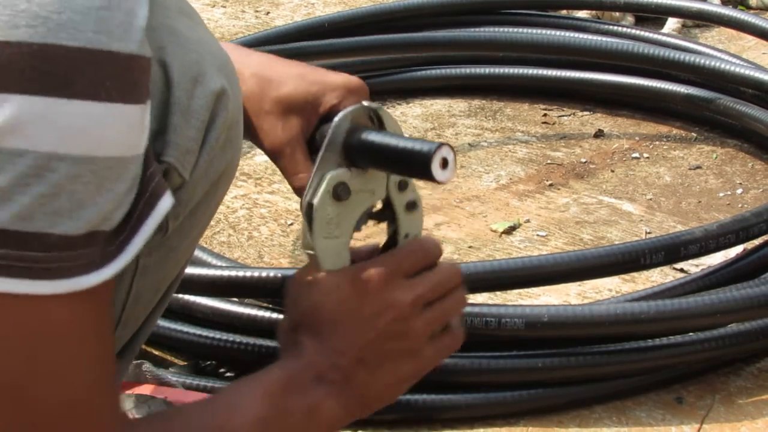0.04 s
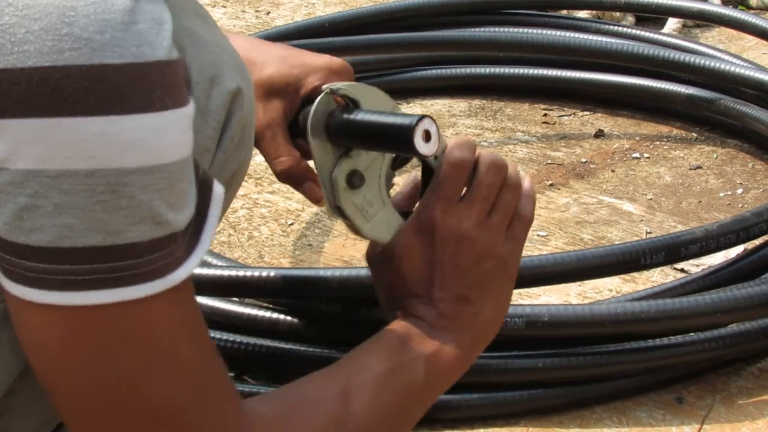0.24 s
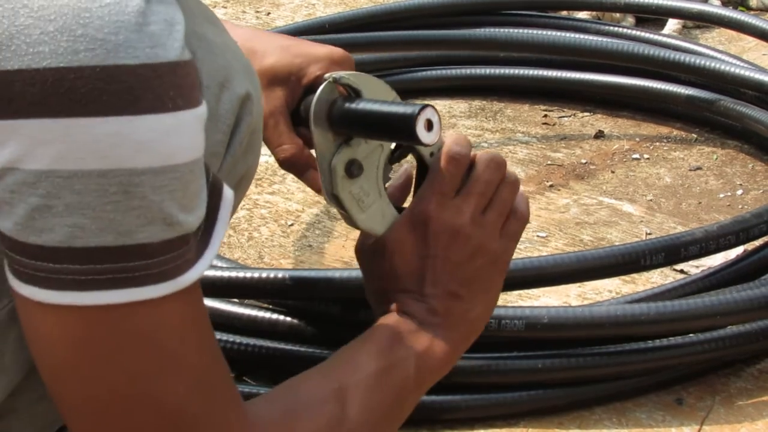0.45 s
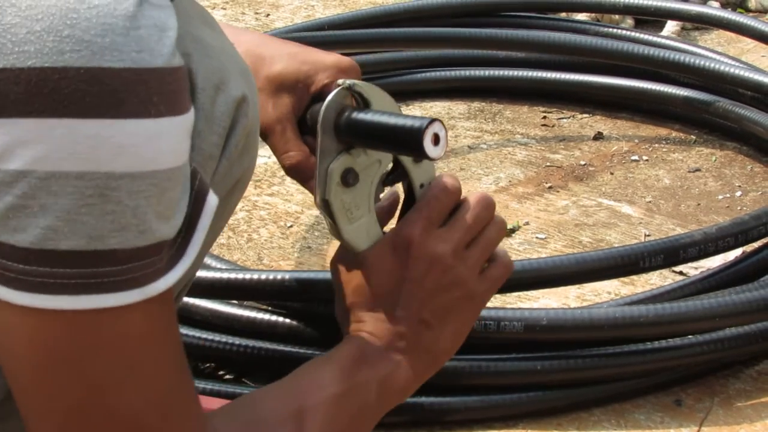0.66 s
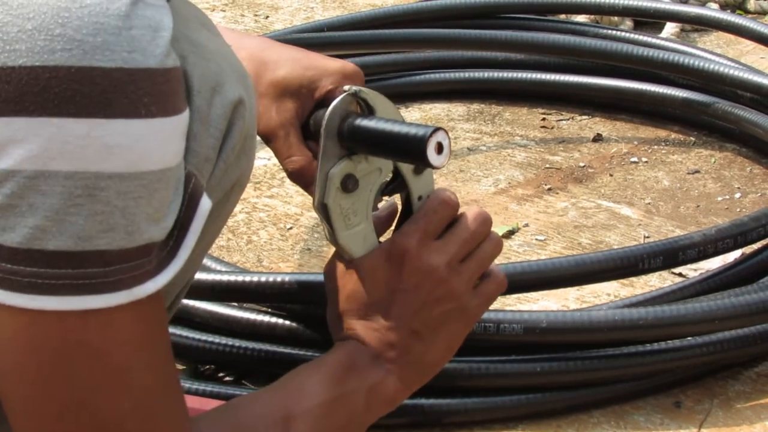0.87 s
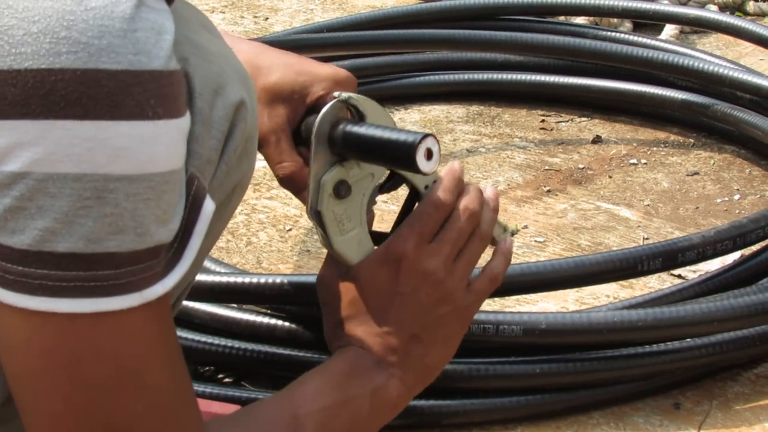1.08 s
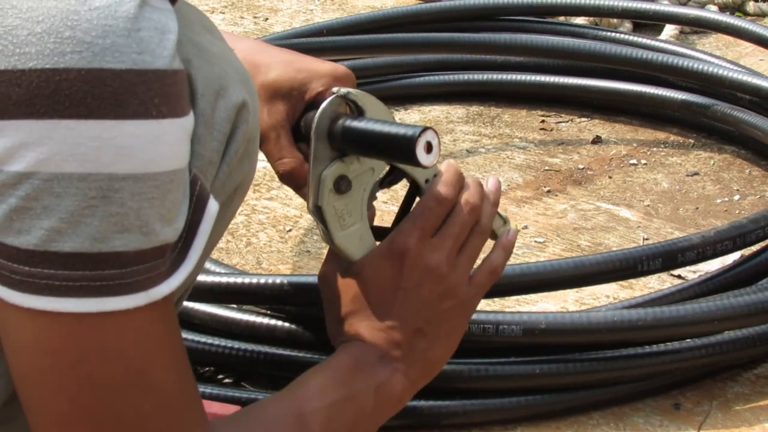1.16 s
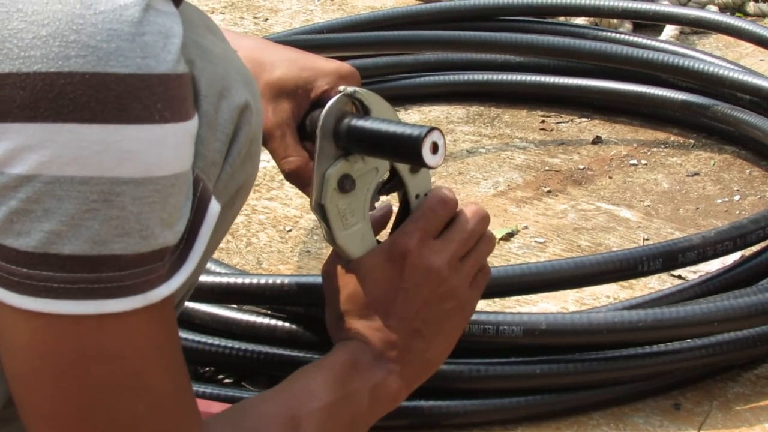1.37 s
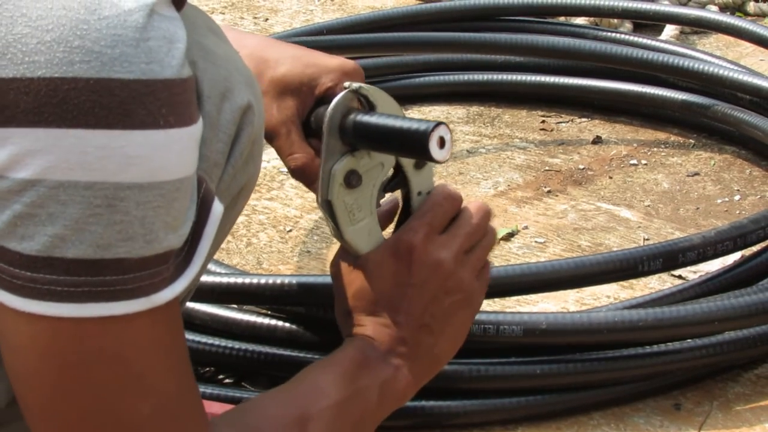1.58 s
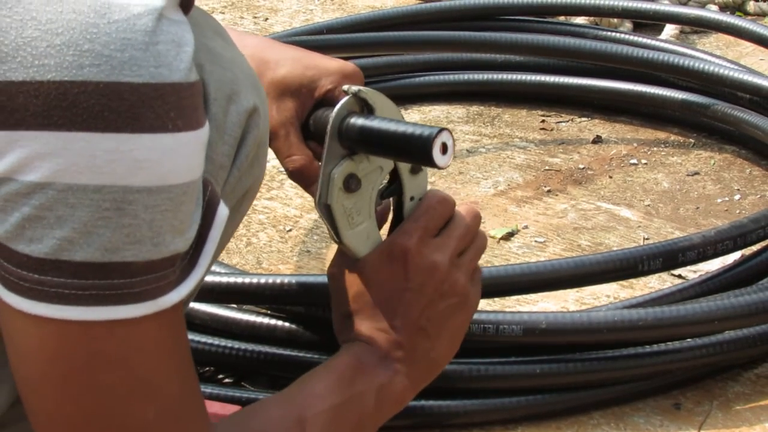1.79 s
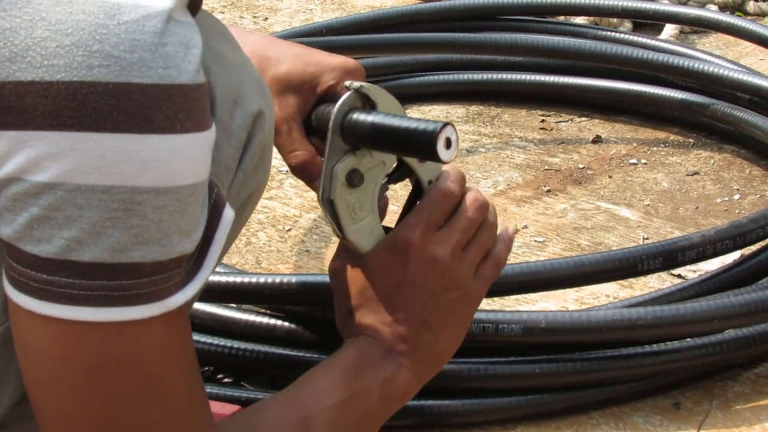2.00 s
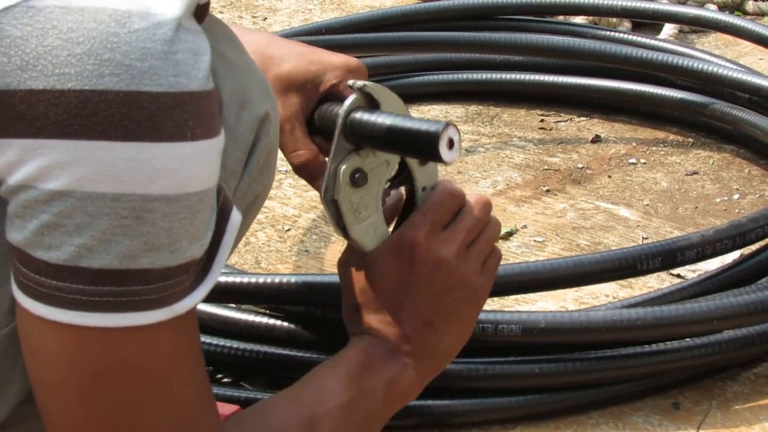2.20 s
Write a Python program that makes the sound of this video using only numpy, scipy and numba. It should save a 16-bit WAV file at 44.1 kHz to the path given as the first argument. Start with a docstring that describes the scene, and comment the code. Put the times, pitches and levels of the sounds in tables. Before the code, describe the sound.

Close by in a yard, a ratcheting cable cutter ticks sparsely, crunches into thick cable and clicks faster up to one hard steel snap. Behind it, a distant machine's fan and motor drone throughout.

```python
"""In a yard, a ratchet cutter is squeezed through a thick cable while a machine hums and blows some way off.
Each impact of the steel pawl excites the damped modes of the jaws and frame, and the cable fractures
with a short crunch. The machine's fan and motor sound harmonics of the shaft rate over a rush of air.
Automatic gain control ducks at the loud clicks and lets the background swell back;
one last hard snap overloads the microphone."""
import sys
import numpy as np
from scipy import signal
from scipy.fft import rfft, irfft
from scipy.io import wavfile
from scipy.ndimage import uniform_filter1d
from numba import njit

SR = 44100
rng = np.random.default_rng(int(sys.argv[2]) if len(sys.argv) > 2 else 0)


def store_wav(level_fs):
    """Save 16-bit WAV to argv[1]."""
    pcm = np.round(np.clip(np.atleast_2d(level_fs), -1, 1) * 32767)
    wavfile.write(sys.argv[1], SR, pcm.T.astype(np.int16))


N = 99225
TIME = np.arange(N) / SR
FREQS = np.maximum(np.arange(N // 2 + 1) * SR / N, 1)
SHAFT_HZ, BLADES = 69.23, 3
DIRECT_SIDE_DB, SCATTER_SIDE_DB = -11.5, -0.5  # side minus mid: direct sound is narrow, scatter wide


def pawl():
    """Impact excitation: the pawl drops onto a tooth, jaws and frame ring, and the yard reflects it."""
    # pawl impacts: start_s, gain_db, tilt_db_per_octave, low_ping_lift_db, frame_knock_db
    clicks = [(0.9814, -12, -5.5, 1, -20), (1.2647, -22.5, -4.5, 0, -20), (1.6801, -20, 4, 5, -15),
              (1.7848, -20, -5.5, 3.5, -20), (1.8161, -6.5, -1.5, 4.5, -18), (1.902, 19.5, 6.5, 0, -2.5),
              (2.2155, -29, -5, 0, -20), (2.2298, -22.5, -2, -3, -20)]
    # modes of the steel jaws: pitch_hz, gain_db, t60_s
    jaw_modes = [(3596, -18.5, 0.0216), (4090, -16, 0.026), (4270, -16.5, .045), (4440, -16.5, 0.029),
                 (5080, -19.5, 0.056), (6300, -14.5, 0.017), (7050, -17, 0.018), (8560, -5.5, 0.014),
                 (8850, -12, 0.019), (9300, -13, 0.023), (9890, -15.5, .026), (10810, -13.5, 0.018),
                 (12070, -16, 0.019), (13250, -24.5, .028), (14400, -21, .018)]
    # modes of the frame: pitch_hz, gain_db, t60_s
    frame_modes = [(1990, -14.5, 0.0067), (2400, -8, 0.0051), (2920, -11.5, 0.0055)]
    # spectrum of the steel contact: frequency_hz, relative_db
    contact_colour = [(300, -19), (1200, -22), (2600, -3), (4300, -7.5), (7600, -14), (9500, 11),
                      (12300, -10.5), (15500, -7.5)]
    # spectrum of its scatter off ground and cable coil: frequency_hz, relative_db
    scatter_colour = [(300, -14), (2800, -5), (4200, 0), (6200, 2.5), (7700, -8.5), (10500, -4.5),
                      (13500, -8), (15500, -9)]
    tail = from_db(-14) * decay(0.075) + from_db(-37) * decay(0.33)  # near scatter, then the yard
    # the scatter carries the jaws' resonances, each 40 Hz in half-width
    peaks = sum(from_db(db) / (1 + ((FREQS - hz) / 40) ** 2) for hz, db, _ in jaw_modes)
    scatter_db = at_hz(scatter_colour) + 14 * np.log10(peaks / peaks.max() + 0.1)
    out = np.zeros((2, N))
    for start_s, db, slope, ping_db, knock_db in clicks:
        brightness_db = tilt_db(FREQS, slope)
        contact = noise(at_hz(contact_colour) + brightness_db, DIRECT_SIDE_DB) * decay(0.014)
        scatter = noise(scatter_db + brightness_db, SCATTER_SIDE_DB) * tail
        steel = ring(jaw_modes, slope, ping_db) + from_db(knock_db) * ring(frame_modes)
        out += from_db(db) * delayed(steel + from_db(-8.5) * contact + scatter, start_s)
    echo = from_db(-30) * delayed(out, delay_s=0.0162)
    return out + echo


def cable():
    """Fracture: the cable gives under the blade in one dull crack and a few smaller ones close behind."""
    # fractures: start_s, gain_db
    cracks = [(1.5983, -7), (1.6038, -17), (1.6092, -22), (1.6137, -16.5)]
    # spectrum of a crack: frequency_hz, relative_db
    colour = [(200, -21), (750, -18), (1150, -2), (2200, -2.5), (3000, -5.5), (4300, -5.5), (5200, -1.5),
              (6400, -8), (8200, -2), (10500, -2), (12500, -10), (15500, -19)]
    # modes a crack excites: pitch_hz, gain_db, t60_s
    modes = [(1150, -14, 0.0188), (3610, -11, 0.03), (6410, 0.5, 0.012), (7600, -5, 0.026)]
    out = np.zeros((2, N))
    for start_s, db in cracks:
        burst = noise(at_hz(colour), DIRECT_SIDE_DB) * decay(0.017)
        scatter = noise(at_hz(colour), SCATTER_SIDE_DB) * decay(0.075)
        out += from_db(db) * delayed(burst + ring(modes) + from_db(-9) * scatter, start_s)
    return out


def machine():
    """Frequency modulation: all the machine's tones waver together with its shaft, over the fan's rush."""
    shaft_time = np.cumsum(1 + 0.0014 * drift(5.1)) / SR
    return fan_rush() + blade_tone(shaft_time) + motor(shaft_time)


def blade_tone(shaft_time):
    """Blade passage: the fan pulses the air at the shaft rate times the number of blades."""
    # course of the tone's level: time_s, level_db
    swell = [(0, -29.5), (0.35, -27), (0.6, -27), (0.75, -23), (1.0, -22.5), (1.3, -25.5), (1.6, -26.5),
             (1.8, -29.5), (2.0, -27), (2.25, -31)]
    balance_db = np.array([[0.8], [-0.8]])
    level_db = np.interp(TIME, *np.transpose(swell)) - 0.05 * drift(8) + balance_db
    return np.sqrt(2) * from_db(level_db) * np.sin(2 * np.pi * BLADES * SHAFT_HZ * shaft_time)


def motor(shaft_time):
    """Periodic vibration: the motor hums at harmonics of the shaft rate, with thin inharmonic whines."""
    # hum: shaft_multiple, level_db
    harmonics = [(1, -47), (2, -44), (6, -39.5), (9, -51.5), (15, -52.5), (24, -55), (27, -45), (28, -56),
                 (30, -61), (33, -47)]
    # whines: pitch_hz, level_db
    whines = [(467, -46), (819, -46), (1232, -53), (1406, -52), (1662, -48.5), (2690, -49.5)]
    hum_flutter_db, whine_flutter_db = 2.34, 2.5
    tones = [(multiple * SHAFT_HZ, db, hum_flutter_db) for multiple, db in harmonics]
    tones += [(hz, db, whine_flutter_db) for hz, db in whines]
    out = np.zeros((2, N))
    for hz, db, flutter_db in tones:
        spread = min(hz / 1100, 1)  # low tones reach both microphones nearly in phase
        phase = rng.uniform(0, 2 * np.pi) + spread * rng.uniform(-0.69, 1, (2, 1))
        amplitude = np.sqrt(2) * from_db(db + flutter_db * drift(7.95))
        out += amplitude * np.sin(2 * np.pi * hz * shaft_time + phase)
    return out


def fan_rush():
    """Broadband flow noise: interfering reflections leave narrow peaks and dips in the rush of the fan."""
    # spectrum of the rush: frequency_hz, relative_db
    colour = [(25, -34.5), (53, -17), (87, -20), (120, -12.5), (160, -19.5), (200, -9.5), (225, -8.5),
              (265, -5), (300, -9.5), (344, -10), (384, -17), (430, -15.5), (503, -15), (607, -18),
              (677, -29.5), (800, -24.5), (900, -25.5), (1040, -23), (1330, -29.5), (1600, -25.5),
              (1840, -23.5), (2760, -24.5), (3300, -28), (4370, -30.5), (5730, -32), (8000, -41),
              (14400, -50.5), (16000, -57)]
    # stereo width: frequency_hz, side_minus_mid_db
    width = [(60, -6.5), (130, -13), (290, -10), (640, -6), (1410, -3), (3100, -4), (6820, -1), (15000, 4)]
    # stereo balance: frequency_hz, left_minus_right_db
    balance = [(60, 0), (120, 3.5), (240, -0.5), (480, -0.5), (950, -1), (1890, -5), (3770, -1),
               (7520, 2.5), (15000, 1)]
    # course of the rush's level: time_s, level_db
    swell = [(0, -24.5), (0.5, -24), (1.0, -25), (1.5, -25), (1.68, -26.5), (1.85, -23), (2.02, -24.5),
             (2.14, -26.5), (2.25, -26)]
    level_db = np.interp(TIME, *np.transpose(swell)) + 0.65 * drift(17)
    ripple = np.interp(FREQS / 22, np.arange(4096), rng.standard_normal(4096))  # a new height every 22 Hz
    ripple_db = 1.6 * ripple * np.minimum(FREQS / 1000, 1)
    return from_db(level_db) * noise(at_hz(colour) + ripple_db, at_hz(width), at_hz(balance))


def ring(modes, slope=0, ping_db=0):
    """Free vibration: struck modes decay, reaching the two microphones slightly out of phase."""
    out = np.zeros((2, N))
    for k, (hz, db, t60_s) in enumerate(modes):
        skew = from_db(DIRECT_SIDE_DB) * rng.standard_normal((2, 1))
        gain = from_db(db + tilt_db(hz, slope) + ping_db * (hz < 6500))
        out += (-1) ** k * gain * decay(t60_s) * np.sin(2 * np.pi * hz * TIME + skew)
    return out


def tilt_db(hz, slope):
    """Spectral tilt about 8 kHz: a harder contact lifts the highs and drops the lows."""
    return slope * np.log2(np.maximum(hz, 2000) / 8000)


def noise(colour_db, side_db, balance_db=0):
    """Spectral shaping: stereo noise of a given colour, width and balance, with an rms of 1."""
    mid, side = rfft(rng.standard_normal((2, N)))
    sign, width = np.array([[1], [-1]]), from_db(side_db)
    spectrum = (mid + sign * width * side) / np.sqrt(1 + width ** 2)
    x = irfft(spectrum * from_db(colour_db + sign * balance_db / 2), N)
    return x / x.std()


def drift(rate_hz):
    """Random fluctuation: low-passed noise with a standard deviation of 1."""
    slow = irfft(rfft(rng.standard_normal(N)) / (1 + (FREQS / rate_hz) ** 2), N)
    return (slow - slow.mean()) / slow.std()


def decay(t60_s):
    """Exponential damping: an envelope that loses 60 dB in t60_s."""
    return from_db(-60 * np.minimum(TIME / t60_s, 4))


def delayed(x, delay_s):
    """Pure delay: the same sound, later."""
    return np.pad(x, ((0, 0), (int(delay_s * SR), 0)))[:, :N]


def at_hz(points):
    """Interpolation of (frequency_hz, value) points along a logarithmic frequency axis."""
    hz, value = np.transpose(points)
    return np.interp(np.log(FREQS), np.log(hz), value)


def from_db(db):
    """Decibels to amplitude ratio."""
    return 10 ** (np.asarray(db) / 20)


@njit
def ducking(excess_db, start_db, attack_s, release_s):
    """Attack and release: gain reduction in dB rises fast to meet the excess and ebbs slowly."""
    out, duck_db = np.empty(len(excess_db)), start_db
    for i in range(len(excess_db)):
        lag_s = attack_s if excess_db[i] > duck_db else release_s
        duck_db += (excess_db[i] - duck_db) / (lag_s * SR)
        out[i] = duck_db
    return out


def scene():
    """Superposition: the cutter close by, the machine behind."""
    return pawl() + cable() + machine()


def record(dry):
    """Compression and clipping: the gain starts low and ducks, the snap overloads, the top is cut."""
    threshold_db, ceiling, stopband_hz = -14, 1.5, 16600
    power = uniform_filter1d(np.mean(dry ** 2, axis=0), size=64)
    level_db = 10 * np.log10(np.maximum(power, 1e-12))
    excess_db = np.maximum(level_db - threshold_db, 0)
    duck_db = ducking(excess_db, start_db=13.0, attack_s=0.0015, release_s=0.7)
    clipped = np.clip(dry * from_db(-duck_db), -ceiling, ceiling)
    low_pass = signal.cheby2(16, 60, stopband_hz, fs=SR, output="sos")
    return signal.sosfilt(low_pass, clipped)


dry = scene()
out = record(dry)
store_wav(out)
```